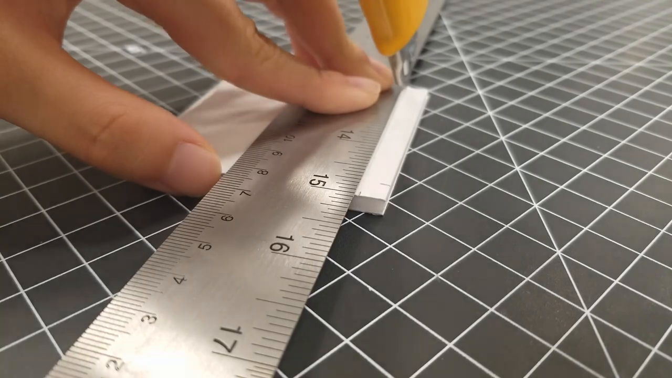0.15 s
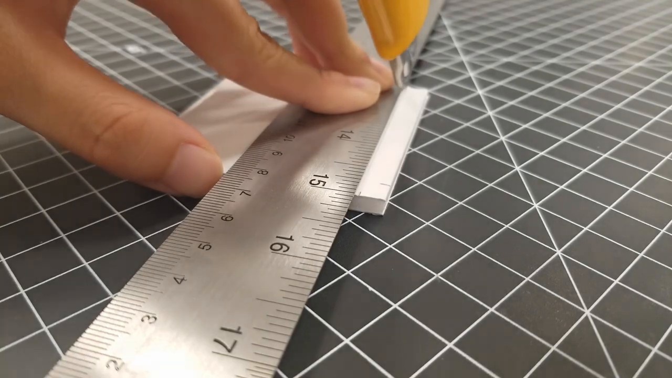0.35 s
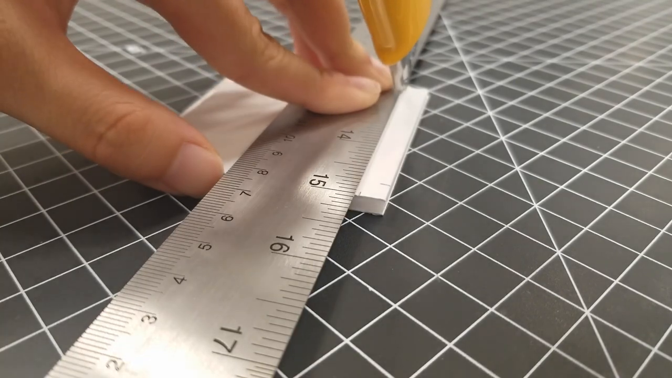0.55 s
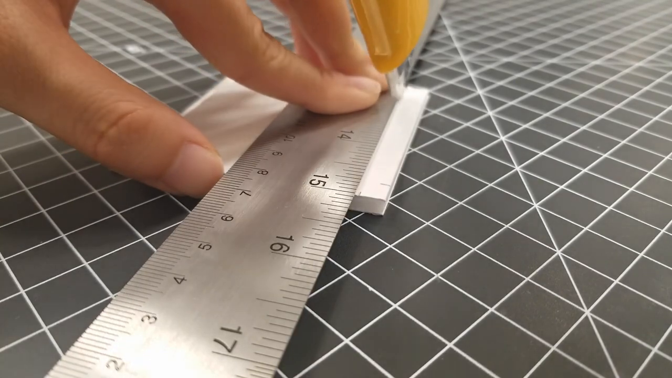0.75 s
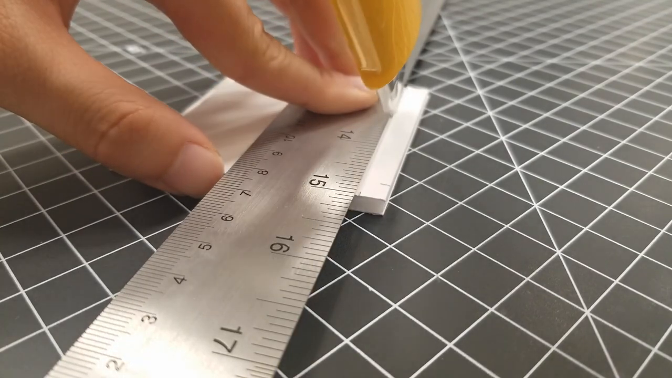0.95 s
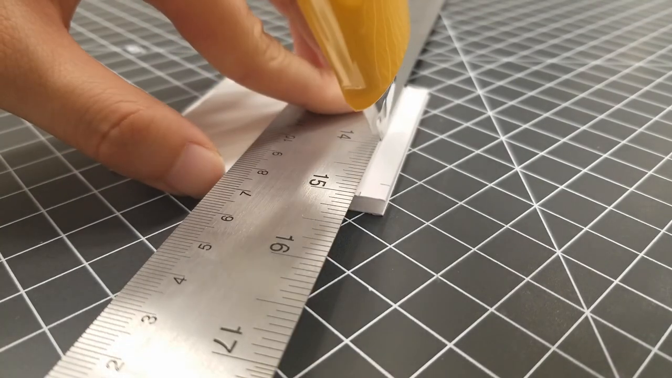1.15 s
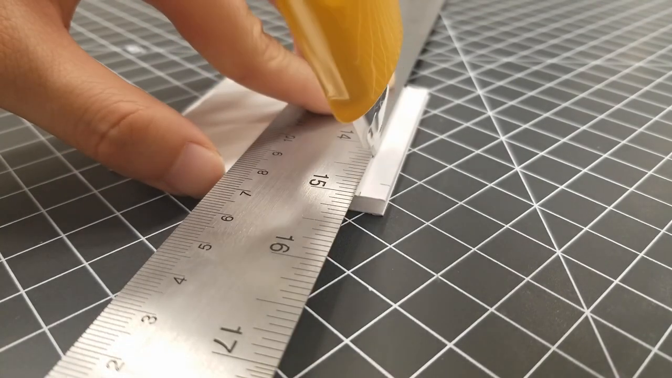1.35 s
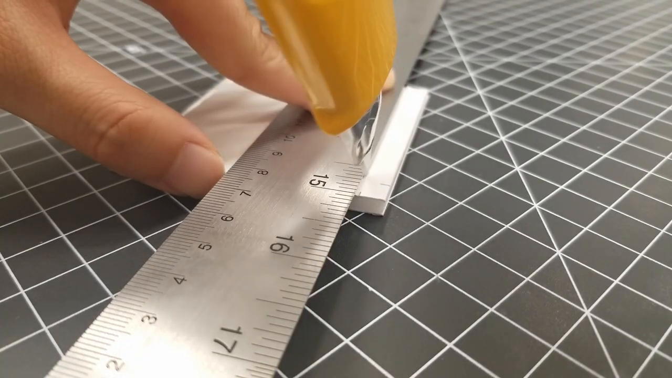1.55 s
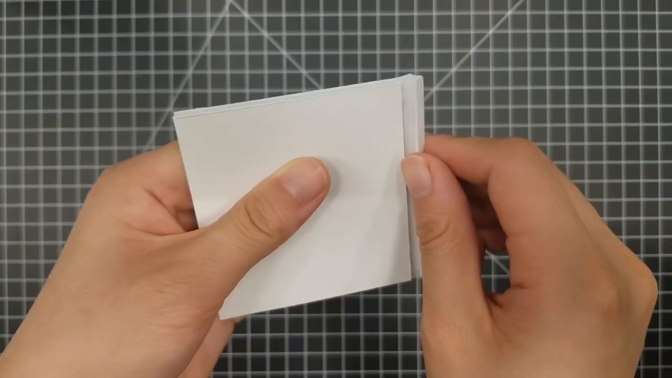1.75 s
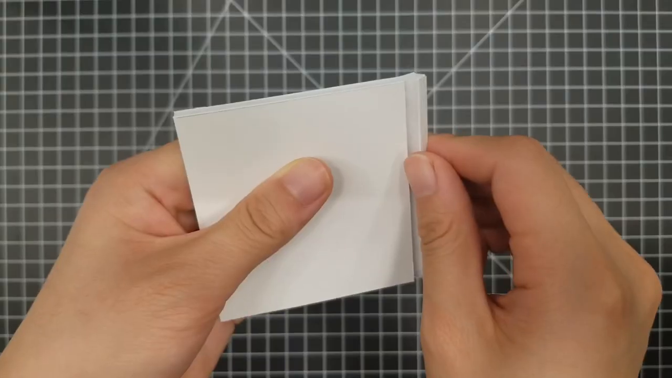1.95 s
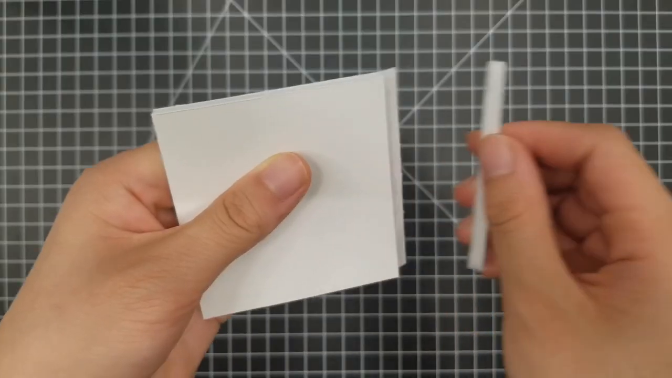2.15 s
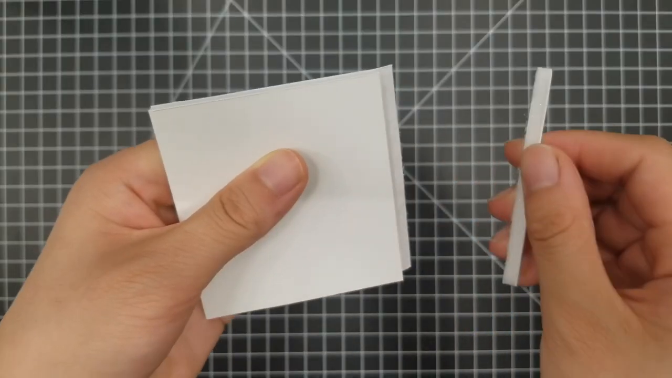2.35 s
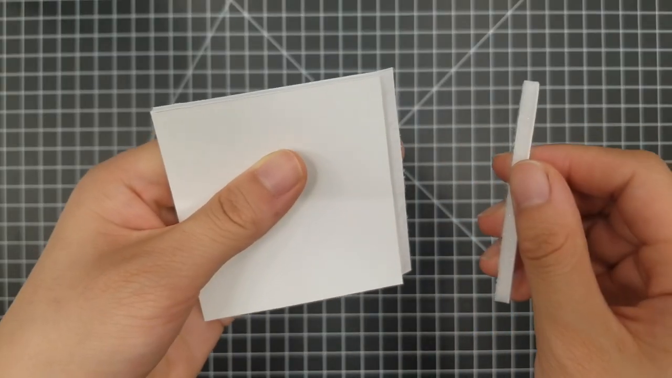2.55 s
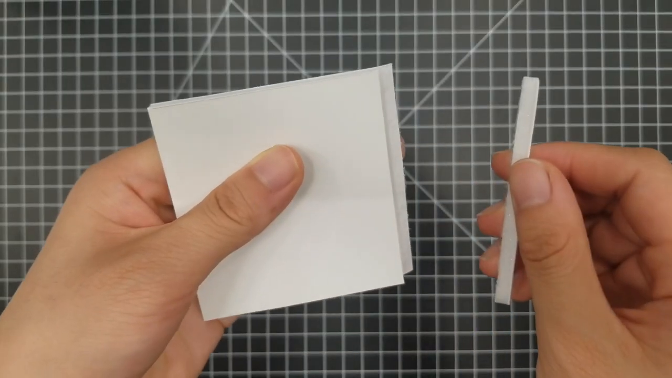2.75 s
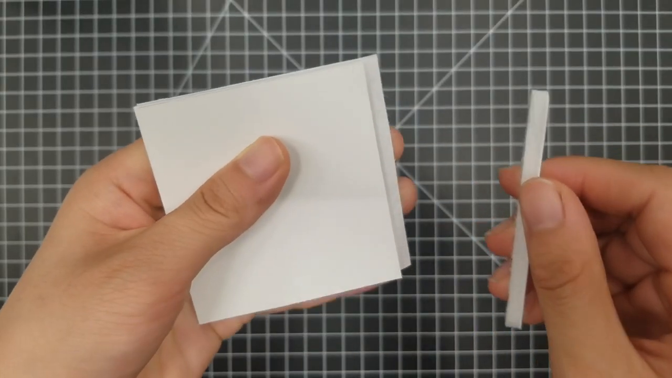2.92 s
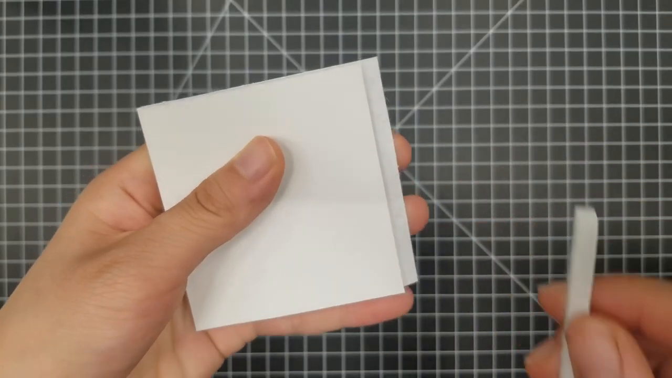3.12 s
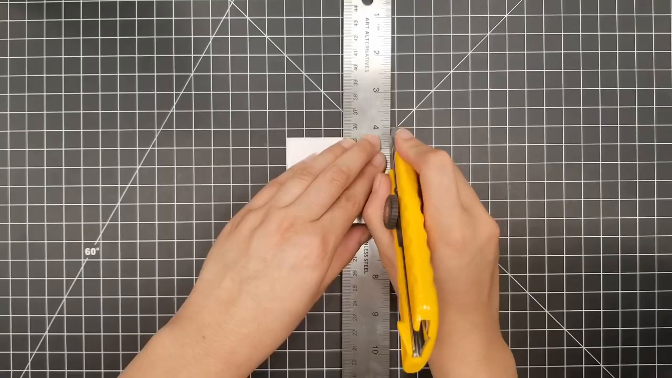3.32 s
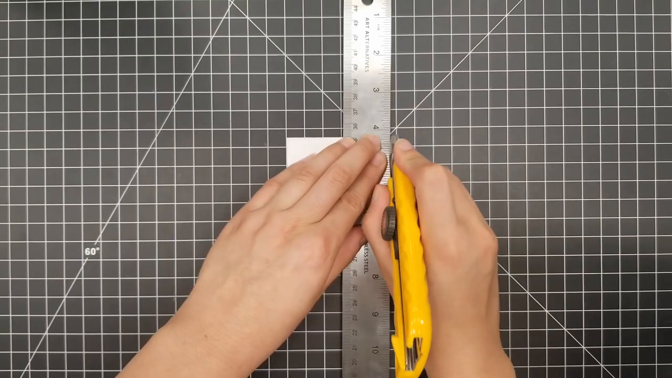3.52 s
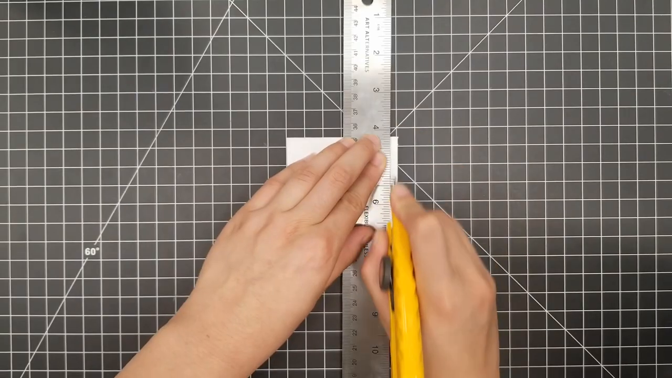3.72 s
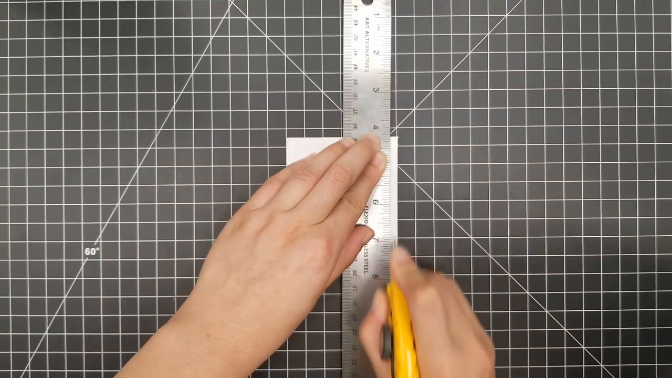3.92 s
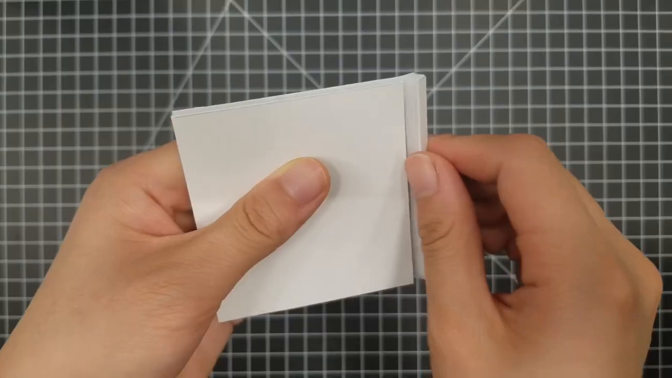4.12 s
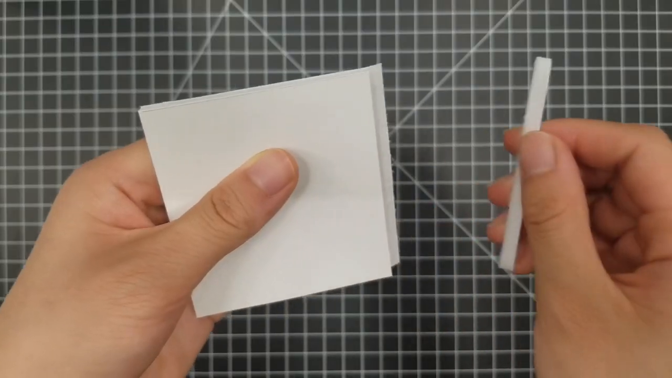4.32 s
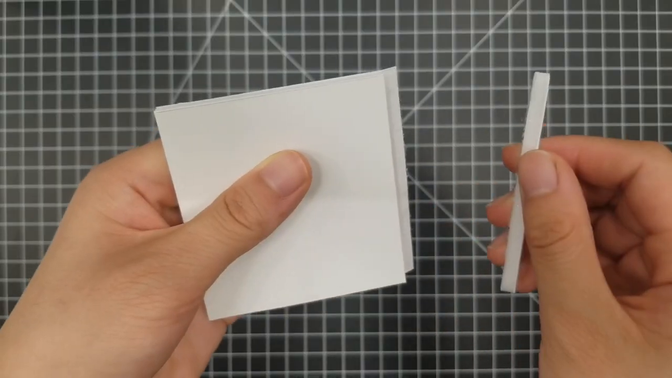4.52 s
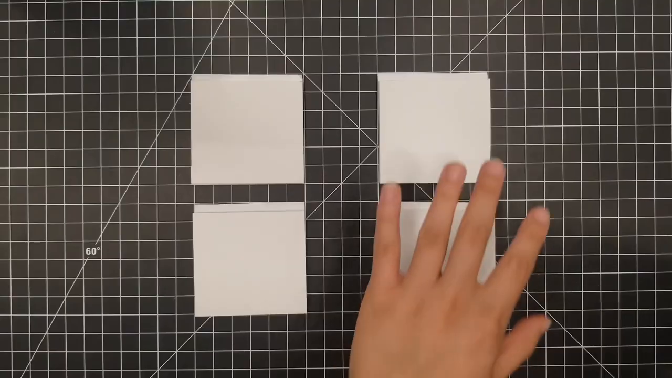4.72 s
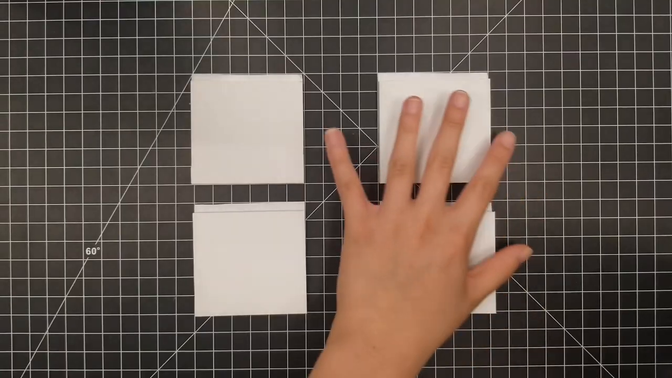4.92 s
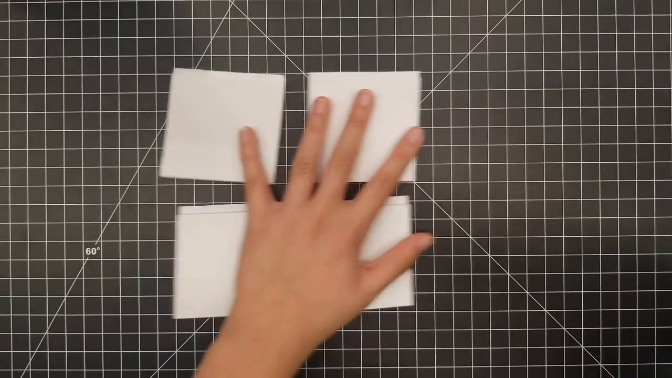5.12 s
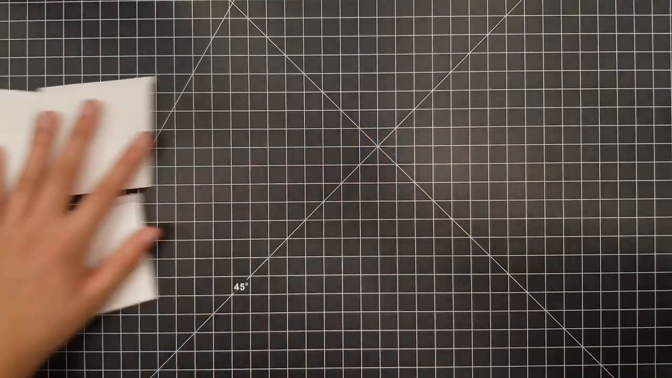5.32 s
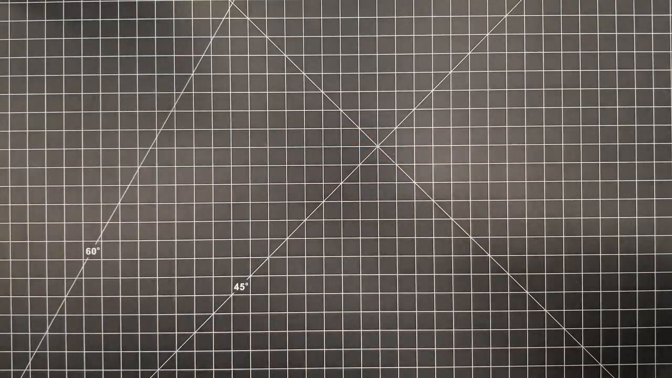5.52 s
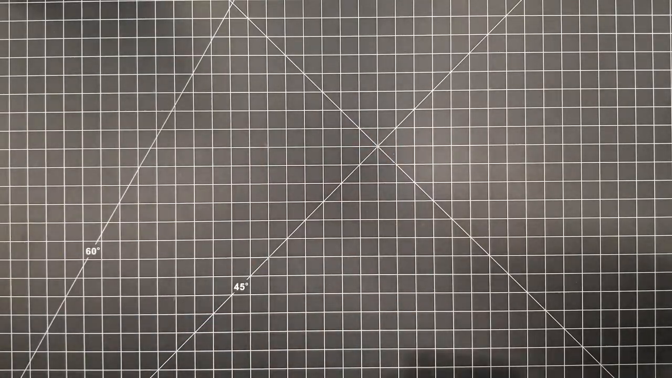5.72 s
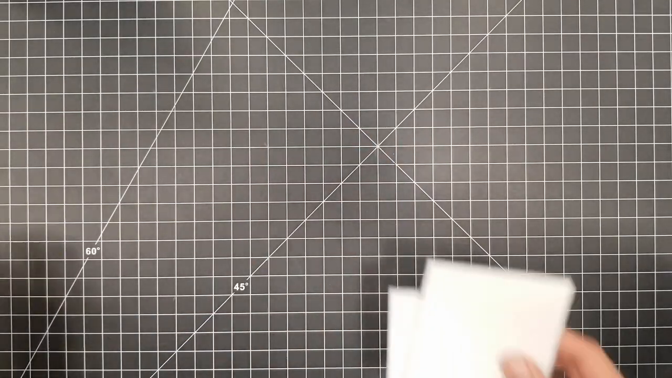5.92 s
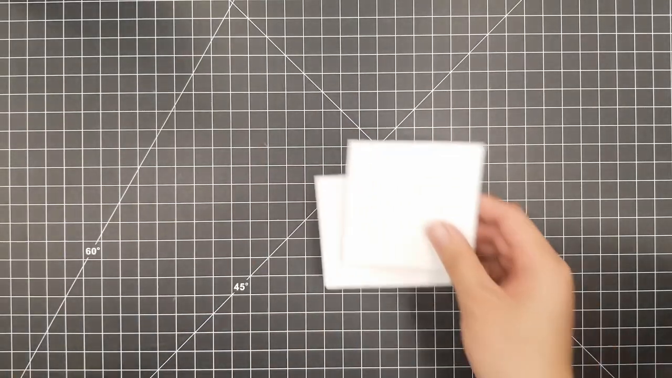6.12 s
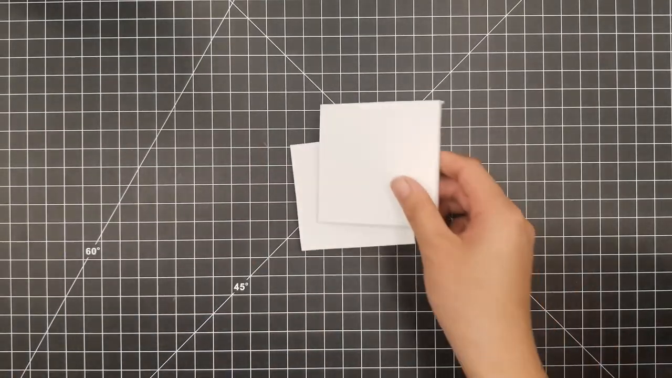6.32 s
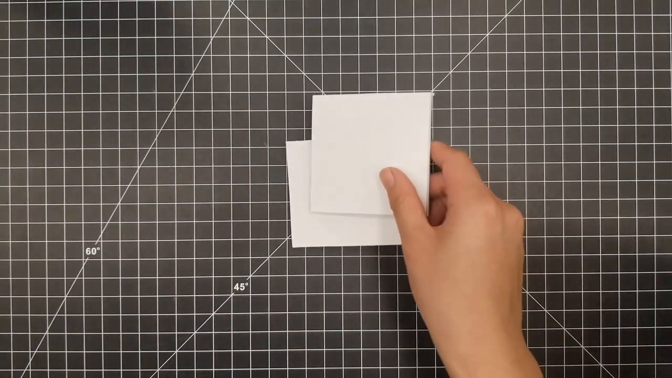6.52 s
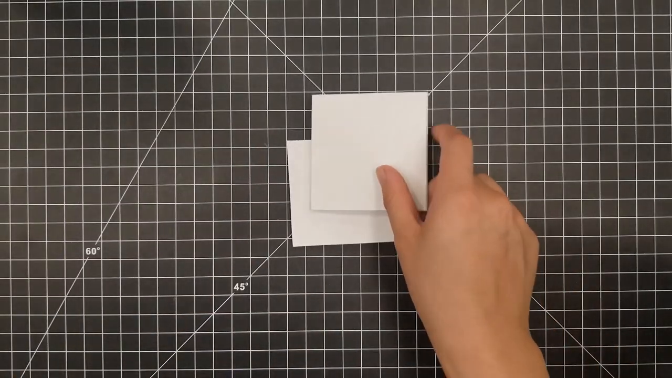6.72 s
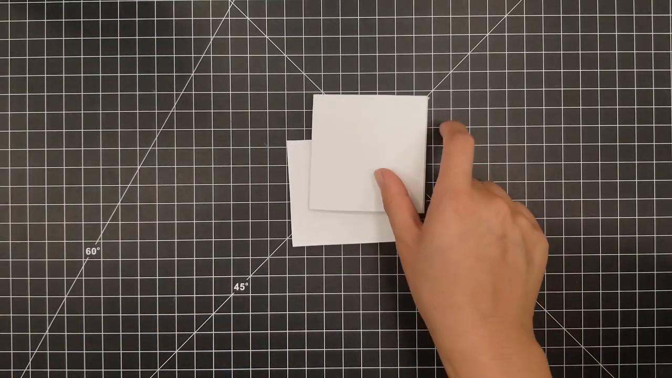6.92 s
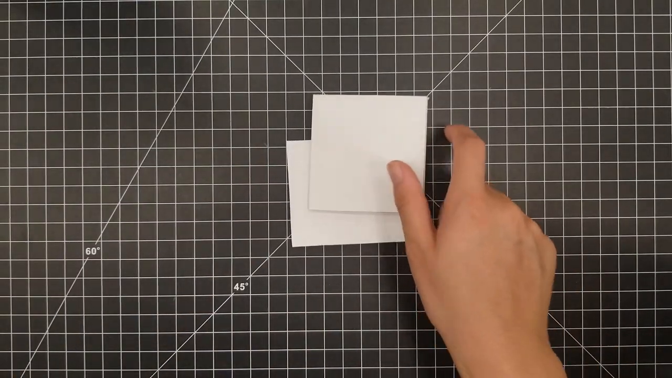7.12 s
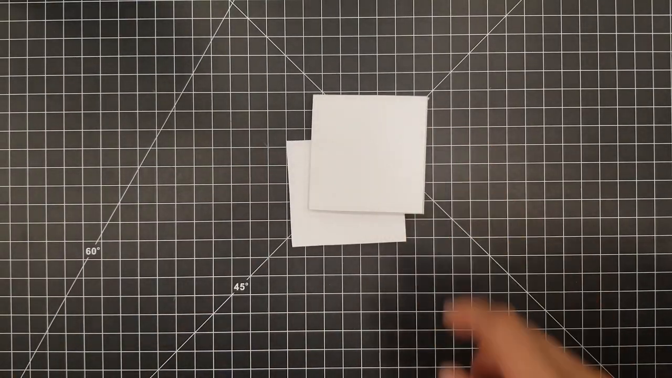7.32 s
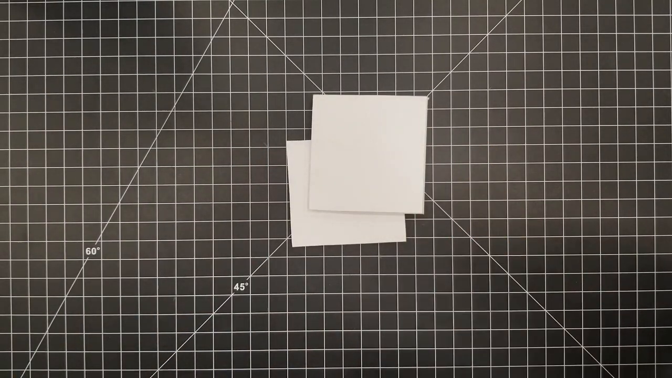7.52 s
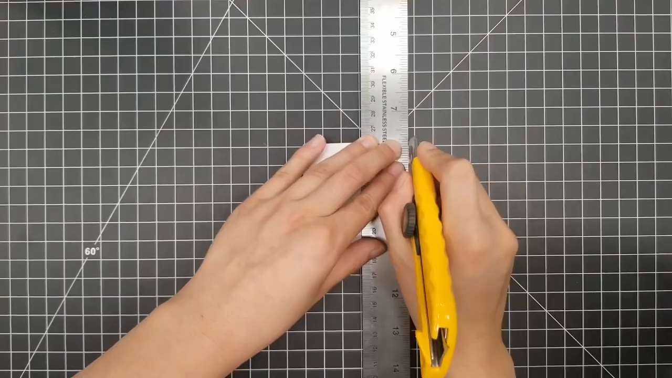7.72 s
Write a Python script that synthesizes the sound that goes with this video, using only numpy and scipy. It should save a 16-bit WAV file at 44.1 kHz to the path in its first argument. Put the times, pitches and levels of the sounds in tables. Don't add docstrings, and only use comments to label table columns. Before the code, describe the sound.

Dry foam cutting with a sharp ringing snap, brief peeling crackles, another knife stroke, then boards sliding and knocking on a mat in a quiet room.

```python
import sys
import numpy as np
from scipy import signal
from scipy.fft import rfft, irfft, next_fast_len
from scipy.io import wavfile
from scipy.ndimage import uniform_filter1d

SR = 44100
rng = np.random.default_rng(int(sys.argv[2]) if len(sys.argv) > 2 else 0)


def master_out(mix):
    frames = np.transpose(np.atleast_2d(mix))
    ceiling = np.clip(frames, -1, 1)
    pcm = np.round(ceiling * 32767).astype(np.int16)
    wavfile.write(sys.argv[1], SR, pcm)


def rack_gain(trim_db):
    fader = np.asarray(trim_db, float)
    return 10 ** (fader / 20)


N = 342216

# t/s, dip/dB, half width/s
SCENE_CHANGES = [
    (1.692, 26, 0.0089),
    (3.187, 20.5, 0.03),
    (3.988, 26, 0.026),
    (4.657, 19, 0.031),
    (7.689, 22, 0.033),
]
HAND_FREQS = [300, 800, 1300, 1900, 2700, 3700, 4800, 7500, 8800, 10000, 11500, 13500, 15500]
# left/dB, right/dB
FIRST_CUT_EQ = [(-4, -14), (-6.5, -21.5), (-16.5, -21.5), (-5, -29.5), (-5.5, -53), (-5, -36.5),
                (-3, -30.5), (2.5, -29.5), (-4, -20.5), (-8, -8.5), (-3, -9), (0.5, -15.5), (-6, -20.5)]


def colour(x, hz, eq, modes):
    size = next_fast_len(x.shape[1] + 2048)
    f = np.arange(size // 2 + 1) * SR / size + 0.00086
    levels_db = [np.interp(np.log(f), np.log(hz), side) for side in np.transpose(eq)]
    gain = rack_gain(np.array(levels_db)) * np.minimum(f / hz[0], 1) ** 2
    for centre, width, db in modes:
        resonance = 1 / (1 + 1j * (f ** 2 - centre ** 2) / (f * width))
        gain = gain * (1 + (rack_gain(db) - 1) * resonance)
    return irfft(rfft(x, size) * gain, size)[:, :x.shape[1]]


def low(x, hz):
    return signal.sosfiltfilt(signal.butter(3, hz, fs=SR, output="sos"), x)


def unit(x):
    return x / np.sqrt(np.mean(x.mean(axis=0) ** 2))


def walk(n, rate):
    hold = int(SR / rate)
    levels = np.repeat(rng.standard_normal(n // hold + 1), hold)
    return 1.08 * uniform_filter1d(levels, hold)[:n]


def pair(a, b, alike):
    alike = np.clip(alike, 0, 1)
    return np.array([a, alike * np.roll(a, 4) + np.sqrt(1 - alike ** 2) * b])


def add(out, t0, x):
    i = int(t0 * SR)
    out[:, i:i + x.shape[1]] += x[:, :N - i]


def rasp(curve, eq, modes, cells, scatter_db, flutter_db, alike):
    s, *columns = np.transpose(curve)
    n = int((s[-1] - s[0]) * SR)
    hit = rng.random((2, n)) < cells / SR
    size = rng.standard_normal((2, n)) * rack_gain(scatter_db * rng.exponential(size=(2, n)))
    bursts = pair(*(hit * size), alike) * rack_gain(flutter_db * walk(n, 70))
    x = colour(bursts, HAND_FREQS, eq, modes)

    body, below = low(x, 3300), low(x, 9000)
    t = s[0] + np.arange(n) / SR
    rasp_db, sizzle_db, body_db = (np.interp(t, s, c) for c in columns)
    body_size = np.std((body - low(body, 900)).mean(axis=0))
    parts = (unit(below - body),
             rack_gain(sizzle_db) * unit(x - below),
             rack_gain(body_db) * body / body_size)
    x = sum(part * rack_gain(flutter_db * walk(n, 40)) for part in parts)

    to_edge = np.minimum(np.arange(n), np.arange(n)[::-1])
    fade = np.minimum(1, to_edge / (0.0062 * SR))
    return s[0], x * rack_gain(rasp_db) * fade


def ticks(events, eq, rise_s, ring_db):
    out, t = np.zeros((2, N)), np.arange(2600) / SR
    for s, db, hz, t60 in events:
        fall = (1 - np.exp(-t / rise_s)) * np.exp(-np.log(1000) * t / t60)
        noise = pair(*rng.standard_normal((2, len(t))), 0.7)
        crack = colour(noise * fall, HAND_FREQS, eq, [])
        sides = np.abs(crack).max(axis=1, keepdims=True)
        ring = sides * fall * np.sin(2 * np.pi * hz * t)
        x = crack + rack_gain(ring_db) * ring
        add(out, s, rack_gain(db) * x / np.abs(x.mean(axis=0)).max())
    return out


def blade_cuts():
    # t/s, rasp 3.3-9 kHz/dB, sizzle above it re rasp/dB, body below it re rasp/dB
    first_cut = [(0.2, -90.5, 14, -10), (0.496, -61.5, 7, -5.5), (0.776, -44.5, 1.5, -11.5),
                 (0.8, -57.5, -0.5, -10), (1.638, -47, -0.5, -6.5), (1.66, -28.5, -1, -20)]
    second_cut = [(3.295, -70, 5.5, -2), (3.927, -49.5, 8, -6.5), (3.98, -68.5, -6, -1)]
    third_cut = [(7.7, -98, 4, -7), (7.714, -75, 3, -7), (7.76, -67.5, 2.5, -22)]
    # left/dB, right/dB
    later_eq = [(-15, -25.5), (-23, -28.5), (-20, -32), (-16.5, -18), (-10.5, -27), (-10, -23.5),
                (-9.5, -18), (-2.5, -18), (-12.5, -13), (-5.5, -7.5), (-3, -5), (1.5, -7), (-2.5, -14)]
    # f/Hz, width/Hz, gain/dB
    first_blade = [(1150, 110, 5.5), (2570, 220, 10), (3470, 88, 6), (4480, 220, 14.5), (7730, 300, 4),
                   (9500, 450, -11.5)]
    later_blade = [(1960, 110, 6.5), (2640, 190, 11), (3200, 440, -26), (4660, 210, 11.5), (8900, 350, -8),
                   (12200, 400, 1)]
    # t/s, peak/dB, ring f/Hz, t60/s
    nicks = [(0.2743, -51, 12400, 0.008), (0.2927, -53, 12400, 0.008), (0.6419, -45, 13300, 0.008),
             (0.8869, -30, 11200, 0.008), (0.9048, -36, 8540, 0.0071), (0.9248, -33.5, 8760, 0.008),
             (1.489, -19.5, 7470, 0.0054), (3.2171, -52, 14800, 0.008), (3.3099, -50, 11300, 0.0096),
             (3.6506, -19.5, 14850, 0.01), (3.9245, -34, 7460, 0.0077), (6.5295, -59, 11400, 0.008),
             (6.6004, -36, 10000, 0.012)]

    out = ticks(nicks, later_eq, rise_s=0.0002, ring_db=-1.0)
    add(out, *rasp(first_cut, FIRST_CUT_EQ, first_blade, cells=14000, scatter_db=1.16, flutter_db=2.5, alike=0.43))
    add(out, *rasp(second_cut, later_eq, later_blade, cells=12000, scatter_db=-2.0, flutter_db=1.66, alike=0.33))
    add(out, *rasp(third_cut, later_eq, later_blade, cells=11000, scatter_db=1.5, flutter_db=-0.2, alike=0.38))
    return out


def blade_snap():
    # t/s, peak/dB, ring f/Hz, t60/s
    snaps = [
        (1.6515, -22.5, 4480, 0.019),
        (1.655, -17.5, 4610, 0.013),
        (1.66, -14, 4290, .015),
        (1.664, -22, 4700, 0.016),
        (1.6675, -23.5, 4480, 0.0097),
        (1.68, -39, 4700, 0.0049),
    ]
    # left/dB, right/dB
    snap_eq = [(-26, -31), (-30.5, -29), (-26, -7.5), (-25.5, -22), (-19.5, -23), (-5.5, -13.5),
               (-2.5, -15), (-7.5, -18.5), (-24, -13.5), (-23.5, -7), (-15.5, -9), (-16, -9.5),
               (-5.5, -13.5)]
    return ticks(snaps, snap_eq, rise_s=0.0006, ring_db=-5.0)


def strip_peel():
    # t/s, rasp/dB, sizzle re rasp/dB, body re rasp/dB
    peel = [(1.97, -74.5, 1, -12), (2.02, -50, 11, -7.5), (2.2, -102, 1.8, -6)]
    # t/s, peak/dB, ring f/Hz, t60/s
    tears = [(1.8826, -46, 11830, 0.015), (1.984, -43, 11000, 0.015), (2.0034, -33, 12650, 0.015),
             (2.0113, -26, 11600, 0.015), (2.0185, -23.5, 12070, 0.021), (2.0274, -16.5, 11700, 0.017),
             (2.0347, -27, 12590, 0.018), (2.0404, -29.5, 12200, 0.015), (2.047, -25, 12400, 0.015),
             (2.4992, -48.5, 15000, 0.015), (2.7591, -46.5, 15000, 0.015)]
    # left/dB, right/dB
    peel_eq = [(-18.5, -41.5), (-37, -54), (-20.5, -35.5), (-22.5, -40.5), (-19, -29.5), (-20.5, -36.5),
               (-20, -38), (-14, -32.5), (-22, -21.5), (-13.5, -17.5), (-5.5, -9), (0.5, -10.5),
               (-0.5, -19)]

    out = ticks(tears, peel_eq, rise_s=0.0009, ring_db=-5.5)
    add(out, *rasp(peel, peel_eq, [], cells=8800, scatter_db=2.0, flutter_db=6.5, alike=0.61))
    return out


def boards():
    # t/s, rasp/dB, sizzle re rasp/dB, body re rasp/dB
    rub = [(2.7, -97, 15, 4), (2.798, -78.5, 7.2, -5.5), (3.1, -90.5, 1, 8)]
    sweep = [(4.925, -69.5, 8, -15), (5.083, -46.5, 0.5, -2.5), (5.44, -43.5, 0.5, -6.5)]
    rattle = [(5.43, -65, -1, -8), (5.44, -45, -0.88, 4), (5.85, -84, 1, 3.5)]
    place = [(5.87, -80.5, 10.3, -13), (6.438, -79.5, 12.4, 9.5), (6.784, -62, 0.76, 5.5), (6.93, -87, 3.7, -17)]
    lift = [(7.42, -86, 6, 6), (7.452, -74.5, -7, -1.5), (7.58, -92.5, 6, -1)]
    # left/dB, right/dB
    sweep_eq = [(-31.5, -39), (-40, -44), (-20.5, -40), (-9, -18.5), (-5.5, -19.5), (0, -8.5), (0.5, -8.5),
                (2.5, -16.5), (-5.5, -5.5), (-2.5, -2), (-3.5, -4), (-1, -13.5), (-6, -12.5)]
    rattle_eq = [(-6.5, -14), (-5, -18), (-6.5, -16.5), (-3.5, -13.5), (-5, -18), (-11, -22.5),
                 (-10.5, -26.5), (-8.5, -30), (-15, -21), (-10.5, -22), (-12, -18), (-13.5, -33),
                 (-15.5, -33)]
    place_eq = [(1, -17.5), (-24, -21), (-6, -27), (-1, -9), (-7.5, -18), (-13, -16.5), (-12.5, -33),
                (-9, -37), (-18.5, -18), (-3, 0), (-6, -11), (-10.5, -14), (-7.5, -25)]
    # f/Hz, width/Hz, gain/dB
    sliding_modes = [(1800, 250, 6), (2880, 300, 3.5), (8300, 400, -8)]
    loose_modes = [(325, 120, 4.7), (1550, 250, 4.2), (2870, 220, 10.2)]
    stack_modes = [(1520, 78, 9.4), (2270, 220, 9.6), (4900, 400, 5.7)]
    # t/s, peak/dB, ring f/Hz, t60/s
    taps = [(2.7886, -58.5, 2800, 0.018), (3.0215, -56.5, 1560, 0.018), (3.9143, -38, 1990, 0.018),
            (5.3604, -32.5, 2380, 0.027), (5.4354, -36.5, 2950, 0.038), (5.4455, -24.5, 1720, 0.025),
            (5.5643, -30, 1424, 0.02), (5.5804, -38, 2700, 0.021), (5.6024, -50.5, 1500, 0.018),
            (6.3006, -48.5, 1750, 0.018), (6.6784, -36.5, 2370, 0.019), (6.7301, -73, 2217, 0.016),
            (6.7895, -28, 3180, 0.015), (6.8144, -49, 2870, 0.018)]

    out = ticks(taps, rattle_eq, rise_s=0.00054, ring_db=-0.5)
    add(out, *rasp(rub, place_eq, stack_modes, cells=8000, scatter_db=2.5, flutter_db=2.5, alike=0.36))
    add(out, *rasp(sweep, sweep_eq, sliding_modes, cells=15000, scatter_db=2.2, flutter_db=-0.1, alike=0.19))
    add(out, *rasp(rattle, rattle_eq, loose_modes, cells=6000, scatter_db=-2.0, flutter_db=3.5, alike=0.71))
    add(out, *rasp(place, place_eq, stack_modes, cells=6100, scatter_db=3.0, flutter_db=2.5, alike=0.48))
    add(out, *rasp(lift, FIRST_CUT_EQ, [], cells=12000, scatter_db=4.0, flutter_db=1.5, alike=0.3))
    return out


def table_thuds():
    # t/s, peak/dB, f/Hz, t60/s, left minus right/dB
    blows = [
        (1.6714, -20.5, 210, .03, 11),
        (1.6705, -23.5, 95, .07, 5.5),
        (5.54, -34.5, 302, 0.092, 9),
        (5.565, -33.5, 368, 0.066, 8),
        (5.581, -38, 174, 0.13, 8),
        (7.44, -42, 92, 0.25, 7.5),
        (7.453, -44.5, 162, 0.11, 14),
    ]
    out, t = np.zeros((2, N)), np.arange(13000) / SR
    for s, db, hz, t60, pan_db in blows:
        fall = np.exp(-np.log(1000) * t / t60) * (1 - np.exp(-t / 0.00033))
        swing = -np.sin(2 * np.pi * hz * t) * fall
        is_close = s < SCENE_CHANGES[0][0]
        sign = np.array([[1], [-1 if is_close else 1]])
        sides_db = db + np.array([[pan_db], [-pan_db]]) / 2
        add(out, s, sign * rack_gain(sides_db) * swing)
    return out


def room(eq, db, alike_hz):
    room_freqs = [25, 60, 120, 250, 400, 600, 1200, 2500, 4500, 7500, 8700, 10500, 12500, 15500]
    # f/Hz, width/Hz, gain/dB
    fan_tones = [(118, 7.9, 11.64), (171.7, 9, 10), (236.4, 13, 10)]
    a, b = rng.standard_normal((2, N))
    b = b - low(b, alike_hz) + 1.1 * low(a, alike_hz) + 0.48 * low(b, alike_hz)
    return rack_gain(db) * unit(colour(np.array([a, b]), room_freqs, eq, fan_tones))


def background():
    # left/dB, right/dB
    close_eq = [(-30.5, -13.5), (-20, -1), (-17.5, -2.5), (-13, -12.5), (-5, -11.5), (-5.5, -15.5),
                (-24.5, -23), (-26, -33), (-35.5, -34.5), (-33.5, -43), (-45.5, -43), (-32.5, -28),
                (-20, -30.5), (-20, -28.5)]
    later_eq = [(-9, -29.5), (-1.5, -19), (-3.5, -20), (-10, -26), (-20, -31), (-28, -32), (-34.5, -39),
                (-37.5, -41), (-45, -46.5), (-42, -56), (-56, -57.5), (-41.5, -42.5), (-34, -39),
                (-35, -40.5)]
    # t/s, level/dB
    rumble = [
        (0.0, -67.5),
        (1.576, -61),
        (1.66, -55),
    ]
    t = np.arange(N) / SR
    close = room(close_eq, -69, alike_hz=150)
    resting_bass_db = -68
    shake = rack_gain(np.interp(t, *np.transpose(rumble)) - resting_bass_db) - 1
    close = close + shake * low(close, 350)
    later = room(later_eq, -57.5, alike_hz=420)
    return np.where(t < SCENE_CHANGES[0][0], close, later)


def scene():
    out = blade_cuts() + blade_snap() + strip_peel() + boards() + table_thuds() + background()
    first, again, end = (round(s * SR) for s in (1.888, 3.988, 4.658))
    out[:, again:end] = out[:, first:first + end - again]
    t = np.arange(N) / SR
    for s, dip_db, half_s in SCENE_CHANGES:
        out *= np.clip(np.abs(t - s) / half_s, rack_gain(-dip_db), 1)
    return out


def band_limit(x):
    return signal.sosfilt(signal.butter(12, 16630, fs=SR, output="sos"), x)


def record(dry):
    top = signal.ellip(8, 0.2, 60, 16000, fs=SR, output="sos")
    mix = signal.sosfilt(top, dry)
    return band_limit(mix)


dry = scene()
out = record(dry)
master_out(out)
```